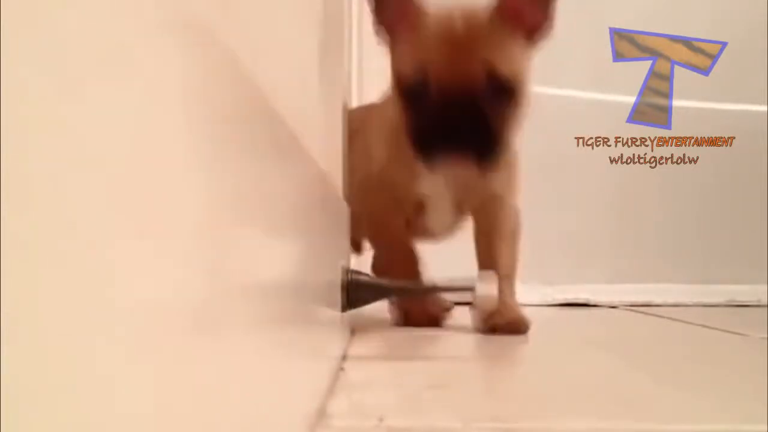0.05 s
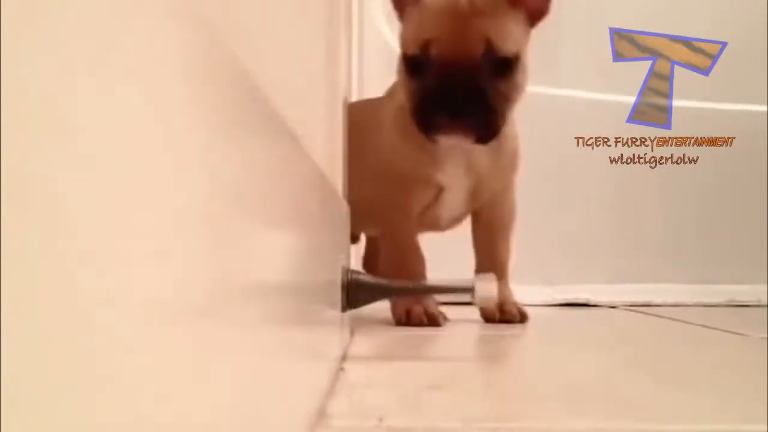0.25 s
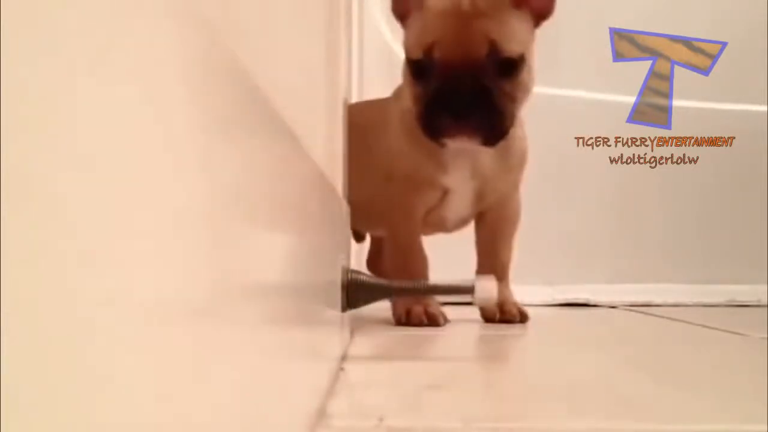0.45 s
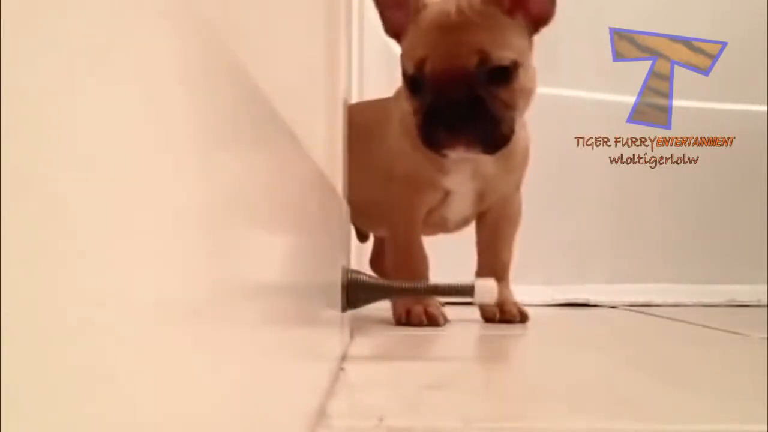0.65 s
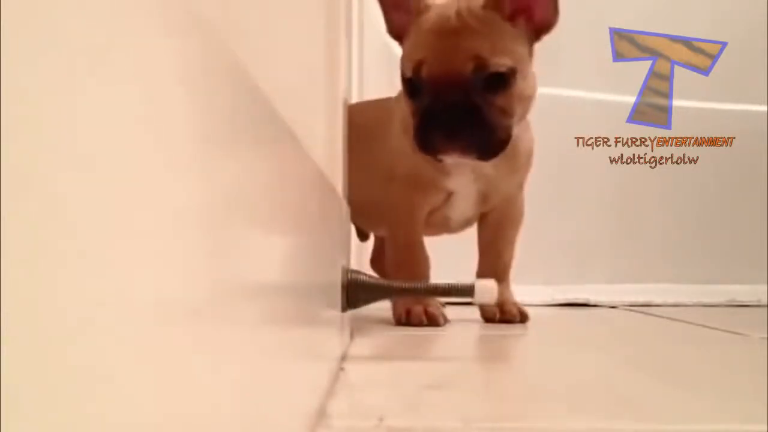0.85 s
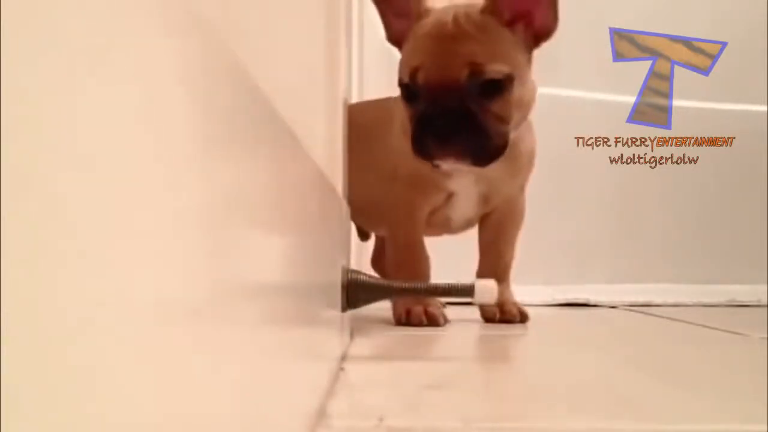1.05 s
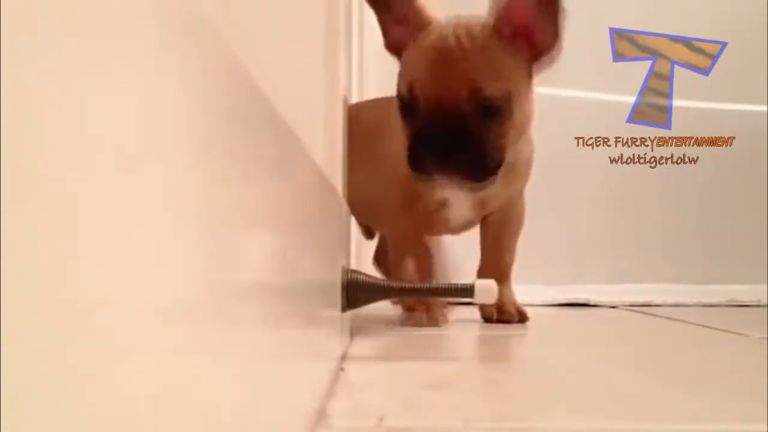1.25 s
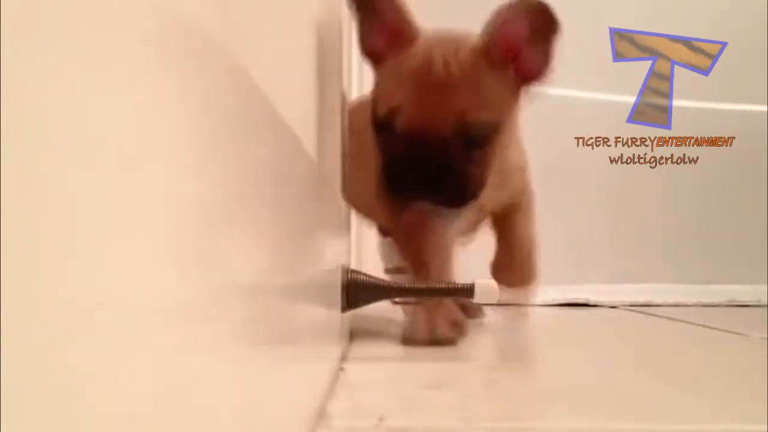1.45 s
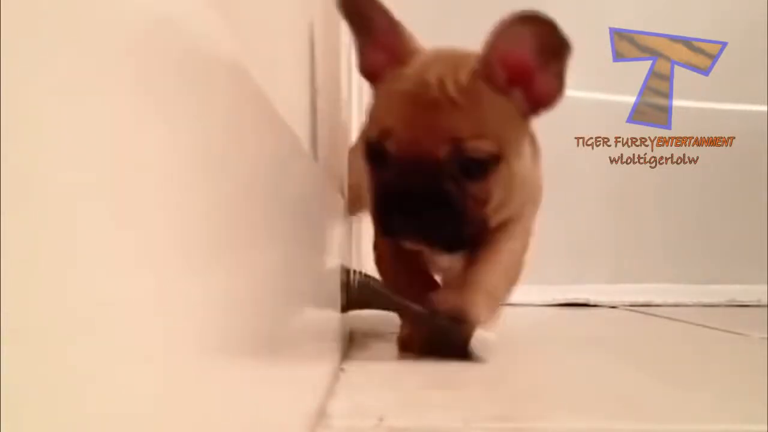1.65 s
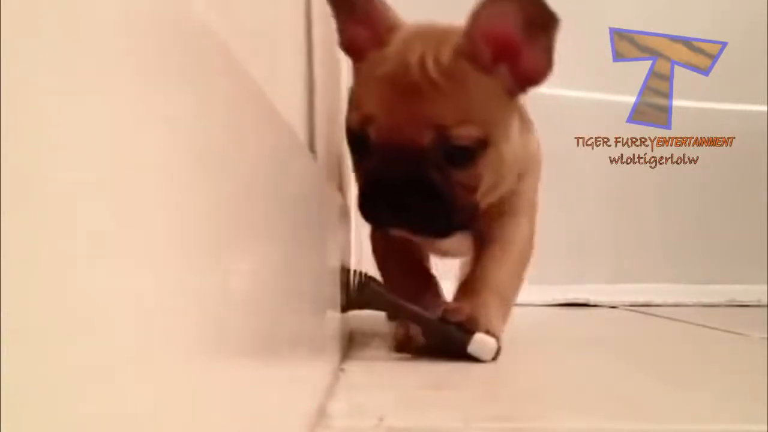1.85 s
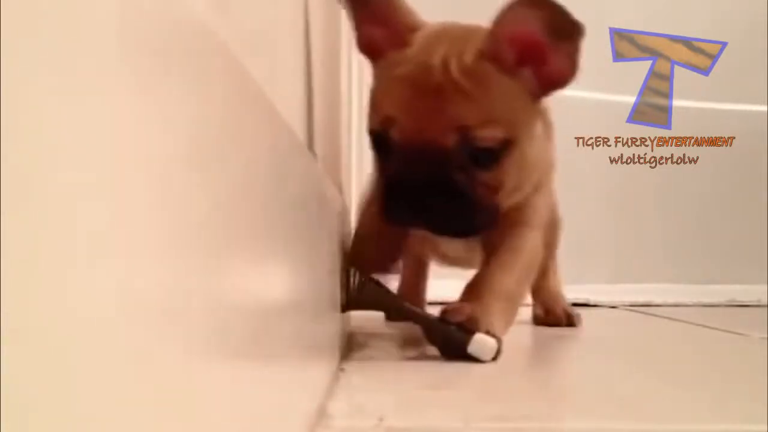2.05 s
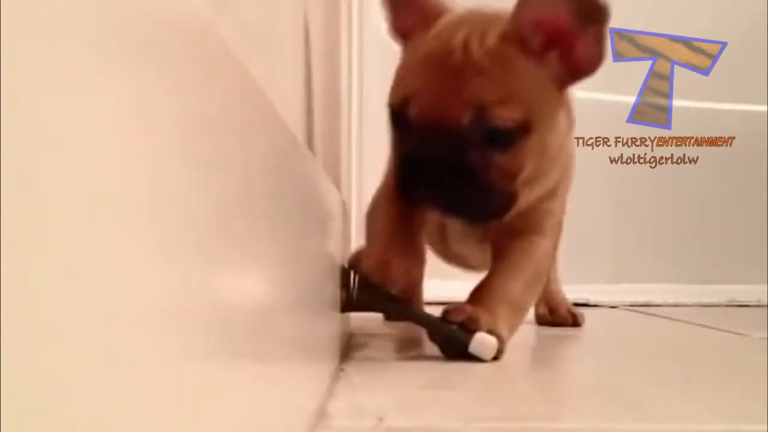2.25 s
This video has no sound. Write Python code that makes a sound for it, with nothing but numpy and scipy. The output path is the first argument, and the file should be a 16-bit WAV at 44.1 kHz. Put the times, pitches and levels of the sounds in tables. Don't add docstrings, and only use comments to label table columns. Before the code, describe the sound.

After soft paw thumps, a coiled spring door stop is flicked and buzzes hard against a hollow door, quickening and fading; later a few claw clicks and rubs, over faint appliance hum, close phone microphone.

```python
import sys
import numpy as np
from scipy import signal
from scipy.io import wavfile
from scipy.ndimage import uniform_filter1d

SR = 44100
rng = np.random.default_rng(int(sys.argv[2]) if len(sys.argv) > 2 else 0)


def undo_db(level):
    steps = np.asarray(level, float) / 20
    return 10 ** steps


def dump_mix(stems):
    frames = np.atleast_2d(stems).T
    limited = np.clip(frames, -1, 1)
    pcm = np.round(limited * 32767).astype(np.int16)
    wavfile.write(sys.argv[1], SR, pcm)


N = 101430

# start_s, tick_db, knock_db, thud_db
WILD_SLAPS = [(.2282, -8, -16, -14.5), (.2488, -32, -36.5, -16), (.2692, -9.5, -27, -14),
              (.2898, -32, -18.5, -15.5), (.3128, -20.5, -35, -16.5), (.3303, -29, -38, -26),
              (.3393, -7.5, -15, -12), (.3551, -20, -10.5, -34), (.3738, -15, -46, -13),
              (.3933, -15, -19, -20.5), (.4178, -22.5, -15.5, -13.5), (.4327, -27.5, -52, -26),
              (.4527, -19, -36.5, -15), (.4733, -42, -19, -17), (.4763, -19, -24, -44),
              (.5115, -13, -22, -18.5), (.5283, -27.5, -23, -20)]
# start_s, tick_db, knock_db, thud_db
FREE_SLAPS = [(0.55, -18.5, -25, -28), (0.5631, -25, -20, -25), (0.5855, -18.5, -23, -23),
              (.5994, -24, -22.5, -22.5), (.621, -16, -22, -25), (.6347, -19.5, -24, -28),
              (.6559, -16, -24.5, -22), (.6689, -22, -21.5, -33), (0.6902, -15, -22, -29),
              (0.7033, -20.5, -21, -24), (.7248, -17.5, -18.5, -35), (0.7374, -21, -23, -27),
              (.7587, -17.5, -22, -37), (0.7703, -25, -26, -27), (0.7915, -19, -26.5, -34),
              (0.8037, -31, -25, -27), (0.8261, -21.5, -21.5, -32), (0.8362, -22.5, -30, -30),
              (0.8576, -16.5, -25, -41), (.8704, -31, -22, -35), (.891, -22, -28.5, -31),
              (.9024, -38, -29, -33), (0.9225, -23, -30, -37.5), (0.9348, -55, -35, -28),
              (0.9525, -21, -27, -24.5), (0.9834, -17.5, -23.5, -27.5), (1.0146, -20, -28.5, -26),
              (1.022, -24, -23.5, -38), (1.043, -18, -27.5, -33), (1.0504, -32, -27, -32.5),
              (1.071, -24.5, -26.5, -29), (1.0764, -37, -41, -44), (1.0984, -33, -37, -42),
              (1.1049, -30.5, -40, -38), (1.1253, -32, -38.5, -34), (1.1334, -30, -45, -35),
              (1.1524, -32, -58, -47), (1.166, -38, -60, -39), (1.1882, -39, -39, -43)]
LAST_SWING_NO = [0, 1, 3, 6, 9, 10]
# start_s, return_lag_s, tick_db, return_tick_db, knock_db, thud_db
LAST_SWINGS = [
    (1.2129, 0.0047, -32, -37.5, -35, -35),
    (1.2393, 0.0057, -31.5, -33, -36.5, -35),
    (1.2875, 0.0045, -39.5, -65, -46.5, -72.5),
    (1.3678, 0.0022, -42.5, -62, -82, -100),
    (1.4454, 0.0075, -56, -46, -88, -99),
    (1.4674, 0.0068, -80, -76, -66, -88),
]
# start_s, tick_db, knock_db, thud_db
TAPS = [
    (0.2166, -69, -42.5, -33),
    (1.8658, -40, -40.5, -58),
    (1.915, -55, -49, -70),
    (2.016, -19.5, -27.5, -48),
    (2.0281, -46, -43, -56),
    (2.0888, -40, -64, -62),
    (2.1046, -55, -44, -64),
    (2.1137, -37.5, -65, -44),
    (2.1208, -55, -66, -67),
    (2.1303, -55, -49, -78),
]


def slap_rows():
    return np.concatenate([WILD_SLAPS, FREE_SLAPS, swings(LAST_SWING_NO, LAST_SWINGS), TAPS])


def swings(numbers, rows):
    n = np.arange(numbers[-1] + 1)
    start_s, lag_s, tick, back, knock, thud = (np.interp(n, numbers, col) for col in np.transpose(rows))
    outward = np.transpose([start_s, tick, knock, thud])
    inward = np.transpose([start_s + lag_s, back, knock, thud])
    slaps_both = np.concatenate([outward, inward])
    jitter_s, spread_db = .0003, 1.2
    return slaps_both + rng.standard_normal(slaps_both.shape) * [jitter_s, spread_db, spread_db, spread_db]


def slaps():
    coils_per_slap, coil_spread_s, coil_fall_db, first_coil_db = 7, .004, 14, -2
    rows = slap_rows()
    start_s, tick_db, knock_db, _ = rows.T
    delay, softness = rng.random((2, len(rows), coils_per_slap))
    later = np.arange(coils_per_slap) > 0
    at = np.round((start_s[:, None] + coil_spread_s * delay * later) * SR).astype(int)
    coil_db = np.where(later, -coil_fall_db * (delay + .5 * softness), first_coil_db)
    tick = burst(at, undo_db(tick_db[:, None] + coil_db), decay_s=.0005)
    knock = burst(at, undo_db(knock_db[:, None] + coil_db), decay_s=.0003)
    rattle = loose_coils(knock)
    return spring(tick, knock, rattle) + door(rows, at, rattle)


def burst(at, gain, decay_s):
    k = np.arange(512)
    puffs = np.exp(-k / (decay_s * SR)) * rng.standard_normal(at.shape + k.shape)
    puffs = puffs * (gain / np.linalg.norm(puffs, axis=-1))[..., None]
    return np.bincount((at[..., None] + k).ravel(), puffs.ravel(), N)[:N]


def loose_coils(knock):
    level_db, decay_s, clicks_per_s = -22.5, 0.029, 2500
    shake = np.sqrt(signal.lfilter([1], [1, -np.exp(-2 / (decay_s * SR))], knock ** 2))
    clicks = rng.standard_normal(N) * (rng.random(N) < clicks_per_s / SR)
    return undo_db(level_db) * shake * clicks


# pitch_hz, width_hz, level_db
COIL_MODES = [(3060, 1000, -14.5), (4190, 1000, -2), (6610, 1140, -3.5), (7740, 630, -0.5),
              (8610, 2070, -5), (11100, 1150, -6), (15100, 2000, -6.5)]
# pitch_hz, width_hz, level_db
KNOCK_MODES = [(980, 600, -6), (1130, 104, -4), (1302, 130, -1.5), (1673, 246, -2), (1970, 115, -2),
               (2430, 324, -3), (3220, 490, -12)]


def spring(tick, knock, rattle):
    tick_level_db, knock_level_db, rattle_coil_db = -6, 0.5, -10
    bright = body(tick + undo_db(rattle_coil_db) * rattle, COIL_MODES)
    return undo_db(tick_level_db) * bright + undo_db(knock_level_db) * body(knock + rattle, KNOCK_MODES)


# pitch_hz, width_hz, level_db
DOOR_MODES = [(210.3, 60, -16.5), (235.8, 27, -5.5), (273.4, 58, -10), (330, 31, 1.5), (370, 78, -2),
              (435, 71, -5.5), (382, 185, -3.5)]
# pitch_hz, width_hz, level_db
PANEL_MODES = [(514.4, 59, -20.5), (629, 15, -18), (613, 480, 6.5), (750, 21, -10), (810, 180, -18.5)]
# start_s, mount_pitch_hz, panel_db, mount_db
MOUNT_STIFFENING = [(0.218, 463, 12, -20.5), (.45, 465, -12.5, -22), (.55, 580, -5.5, -18.5),
                    (.7, 640, -13, -21.5), (.8, 536, -7, -25), (.87, 566, -10, -20), (1.0, 524, -26, -19.5),
                    (1.1, 656, -15, -22.5), (1.3, 623, -8, -20.5)]


def door(rows, at, rattle):
    thud_level_db, panel_slope, rattle_mount_db = -1, .8, -17
    start_s, _, knock_db, thud_db = rows.T
    swinging = start_s < LAST_SWINGS[-1][0]
    force_db = panel_slope * np.maximum(knock_db, thud_db)
    s, _, panel_db, mount_db = np.transpose(MOUNT_STIFFENING)
    panel_gain = swinging * undo_db(np.interp(start_s, s, panel_db) + force_db)
    mount_gain = swinging * undo_db(np.interp(start_s, s, mount_db) + force_db)
    deep = body(push(at[:, 0], undo_db(thud_db)), DOOR_MODES)
    panel = body(push(at[:, 1], panel_gain), PANEL_MODES)
    stiff = mount(push(at[:, 2], mount_gain) + undo_db(rattle_mount_db) * rattle)
    return undo_db(thud_level_db) * (deep + panel + stiff)


def mount(blows):
    width_hz = 260
    s, pitch_hz = np.transpose(MOUNT_STIFFENING)[:2]
    turn = np.exp(2j * np.pi * np.cumsum(np.interp(np.arange(N) / SR, s, pitch_hz)) / SR)
    r = np.exp(-np.pi * width_hz / SR)
    return (turn * signal.lfilter([1 - r], [1, -2 * r, r * r], blows / turn)).real * 20


def push(at, gain):
    blows = np.bincount(at, gain * rng.choice([-1., 1.], len(at)), N)[:N]
    band_hz = (183, 1300)
    return signal.sosfilt(signal.butter(N=4, Wn=band_hz, btype="bandpass", fs=SR, output="sos"), blows)


def body(x, modes):
    def ring(v):
        return sum((-1) ** k * undo_db(db) * resonate(v, hz, width_hz) * np.sqrt(SR / width_hz)
                   for k, (hz, width_hz, db) in enumerate(modes))
    click = np.eye(1, 2048)[0]
    return ring(x) / abs(ring(click)).max()


def resonate(x, hz, width_hz):
    r = np.exp(-np.pi * width_hz / SR)
    return 2 * signal.lfilter([1 - r], [1, -r * np.exp(2j * np.pi * hz / SR)], x + 0j).real


# start_s, peak_db, pitch_hz, ring_s
THUMPS = [(.003, -40, 243, 0.0022), (.045, -31.5, 345, 0.0029), (.046, -39.5, 723, 0.0023),
          (0.048, -50.5, 1400, 0.0033), (0.057, -32.5, 306, 0.0034), (.072, -33.5, 270, 0.0023),
          (0.083, -43, 330, 0.0012), (0.107, -40.5, 241, 0.0067), (1.661, -47, 211, 0.0055),
          (1.869, -33.5, 350, 0.0022), (1.891, -39.5, 362, 0.0036), (1.917, -48, 330, 0.0074),
          (1.952, -46.5, 224, 0.0063), (2.0161, -21, 520, 0.0014), (2.03, -26.5, 527, 0.00083),
          (2.044, -35, 330, 0.0046), (2.051, -49, 530, 0.0049), (2.165, -52, 606, 0.0023),
          (2.18, -44, 405, 0.0021), (1.018, -37, 407, 0.0067), (0.986, -27, 386, 0.0032)]


def thumps():
    out, t = np.zeros(N), np.arange(2048) / SR
    for start_s, peak_db, pitch_hz, ring_s in THUMPS:
        part = out[round(start_s * SR):][:len(t)]
        swell = t / ring_s * np.exp(1 - t / ring_s)
        part += undo_db(peak_db) * swell * np.sin(2 * np.pi * (pitch_hz * t + rng.random()))
    return out


# start_s, rise_s, fall_s, level_db
SCUFFS = [
    (.003, 0.036, 0.079, -48),
    (.188, 0.048, 0.11, -46.5),
    (1.453, 0.023, 0.14, -92),
    (1.632, 0.053, 0.049, -68),
    (1.834, 0.058, 0.22, -57),
    (2.025, 0.09, 0.05, -62),
    (2.256, 0.024, 0.046, -73),
]
# freq_hz, density_db_per_hz
SCUFF_SPECTRUM = [(520, -5), (920, -3), (2100, -3), (4400, -10.5), (5400, -2), (7600, -10.5), (9600, -10.5),
                  (12100, -2.5), (15200, -16)]
# start_s, rise_s, fall_s, level_db
RUSTLES = [
    (1.46, 0.029, .08, -59.5),
    (1.64, .045, 0.036, -61),
    (1.86, .012, .05, -59),
    (1.905, 0.0096, 0.061, -59),
    (2.014, .004, 0.04, -41),
]
# freq_hz, density_db_per_hz
RUSTLE_SPECTRUM = [(300, -19), (600, -15), (1000, 10), (1500, -8), (2300, 14.5), (3000, -14), (4400, -13),
                   (6000, -17), (15000, -37)]


def paws():
    return slides(SCUFFS, SCUFF_SPECTRUM) + slides(RUSTLES, RUSTLE_SPECTRUM)


def slides(rows, spectrum):
    t = np.arange(N) / SR
    level = np.zeros(N)
    for start_s, rise_s, fall_s, level_db in rows:
        rise = np.clip((t - start_s) / rise_s, 0, 1) ** 2
        fall = undo_db(-20 * np.maximum(t - start_s - rise_s, 0) / fall_s)
        level += undo_db(level_db) * rise * fall
    grain = undo_db(2 * evened(uniform_filter1d(rng.standard_normal(N), size=90)))
    return level * evened(grain * coloured(spectrum, patchy_db=2))


def coloured(spectrum, patchy_db):
    a, b, patches = rng.standard_normal((N // 128 + 5, 257, 3)).T
    patches = evened(uniform_filter1d(uniform_filter1d(patches, 8, 0), 16, 1))
    level_db = read(spectrum, np.fft.rfftfreq(512, 1 / SR))[:, None] + patchy_db * patches
    return signal.istft((a + 1j * b) * undo_db(level_db), nperseg=512, noverlap=384)[1][:N]


def evened(x):
    return x / np.sqrt(np.mean(x ** 2) + 1e-20)


def read(points, hz):
    f, value = np.transpose(points)
    return np.interp(np.log(hz + 1), np.log(f + 1), value)


# freq_hz, t60_s
ROOM_DECAY = [(210, 0.083), (610, 0.26), (2100, 0.36), (4600, 0.39), (8100, 0.13), (14900, 0.11)]
# freq_hz, level_db
ROOM_COLOUR = [(200, -6), (1500, -2.5), (4200, 0.5), (8000, -12), (15000, -2.5)]


def tail():
    taps = np.zeros(SR // 2)
    at = np.arange(200, len(taps) - 20, 20)
    taps[at + rng.integers(0, 20, len(at))] = rng.choice([-1., 1.], len(at))
    hz, t, z = signal.stft(taps, SR, nperseg=256)
    z = z * undo_db(-60 * t / read(ROOM_DECAY, hz)[:, None])
    z = z * (undo_db(read(ROOM_COLOUR, hz)) / np.linalg.norm(z, axis=1))[:, None]
    return signal.istft(z, SR, nperseg=256)[1] / 148


def room(x):
    turns_per_s = 9
    turn = np.pi * turns_per_s * np.arange(N) / SR
    wet = np.zeros(N)
    for k in range(3):
        share = np.sqrt(2 / 3) * np.cos(turn + k * np.pi / 3)
        wet += signal.fftconvolve(x * share, tail())[:N]
    return wet


# pitch_hz, rms_db
HUM_TONES = [(119.6, -56), (151, -69.5), (177, -65), (209, -57.5), (241, -61.5), (270, -60.5), (336, -65.5)]
# freq_hz, density_db_per_hz
AIR_SPECTRUM = [(180, -13), (300, -1), (1000, -25.5), (1260, -15.5), (2000, -17.5), (6760, -27.5),
                (9090, -42.5), (14000, -33), (15400, -33)]


def hum():
    width_hz, air_db = 10.7, -60
    line_hz, line_db = HUM_TONES[0]
    out = undo_db(line_db) * np.sqrt(2) * np.sin(2 * np.pi * line_hz * np.arange(N) / SR)
    for hz, db in HUM_TONES[1:]:
        narrow = resonate(rng.standard_normal(N), hz, width_hz)
        out += undo_db(db) * evened(resonate(narrow, hz, 2 * width_hz))
    return out + undo_db(air_db) * evened(coloured(AIR_SPECTRUM, patchy_db=1.5))


def scene():
    near = slaps() + thumps() + paws()
    mid = near + room(near) + hum()
    side_hz, side_db = (230, 520), -23
    low_mids = signal.butter(N=2, Wn=side_hz, btype="bandpass", fs=SR, output="sos")
    side = undo_db(side_db) * signal.sosfiltfilt(low_mids, mid)
    return np.array([mid + side, mid - side])


def roll_off(x):
    return signal.sosfilt(signal.butter(12, 16470, fs=SR, output="sos"), x)


# freq_hz, gain_db
MIC_RESPONSE = [(3000, -0.5), (3600, 2.5), (4300, 7), (5300, 0.5), (7700, 10), (10000, 8), (11700, 7),
                (15000, 5)]


def record(dry):
    low_cut_hz, edge_hz, limit, lopsided_db = 104, 15300, 1.3, -25
    x = signal.sosfilt(signal.butter(N=6, Wn=low_cut_hz, btype="highpass", fs=SR, output="sos"), dry)
    x = limit * np.tanh(x / limit)
    x = x + undo_db(lopsided_db) * signal.lfilter([1, -1], [1, -.998], x ** 2)
    hz = np.linspace(0, SR / 2, 257)
    port = signal.firwin2(129, hz, undo_db(read(MIC_RESPONSE, hz)), fs=SR)
    x = signal.oaconvolve(x, port[None], "same")
    band_limit = signal.firwin(101, edge_hz, window=("kaiser", 5), fs=SR)
    x = signal.oaconvolve(x, band_limit[None], "same")
    return roll_off(x)


dry = scene()
out = record(dry)
dump_mix(out)
```